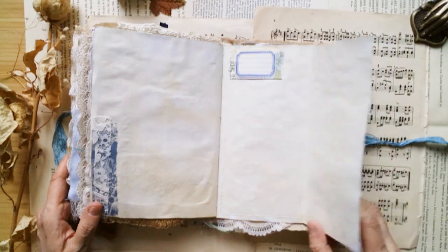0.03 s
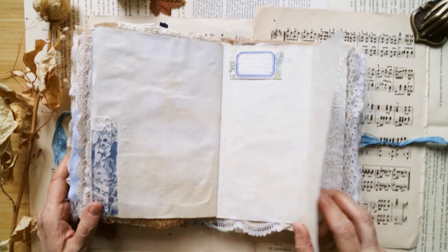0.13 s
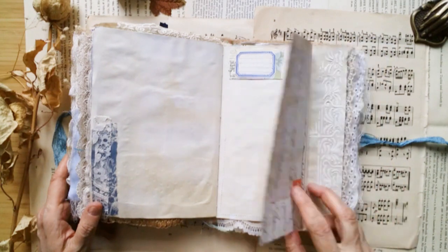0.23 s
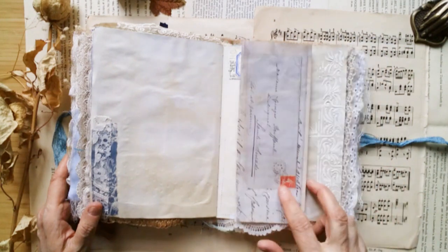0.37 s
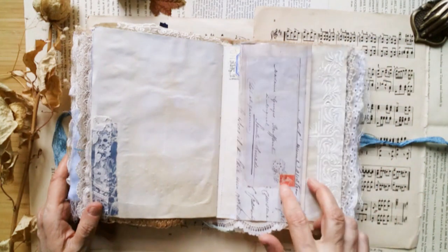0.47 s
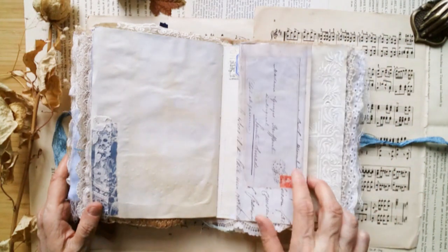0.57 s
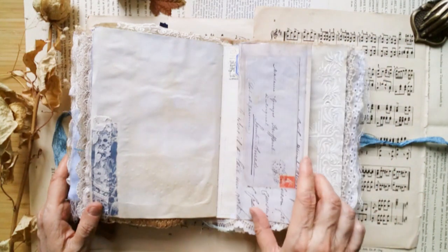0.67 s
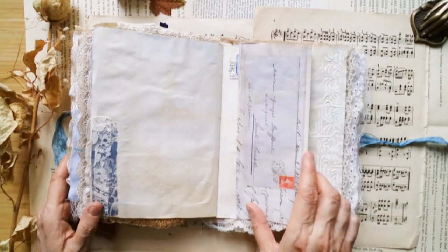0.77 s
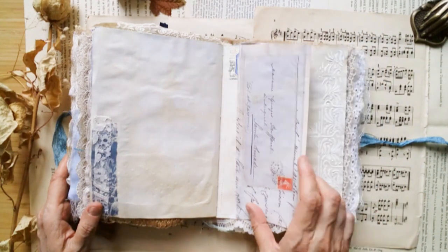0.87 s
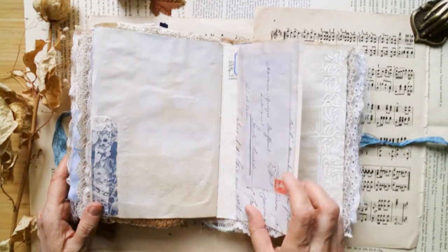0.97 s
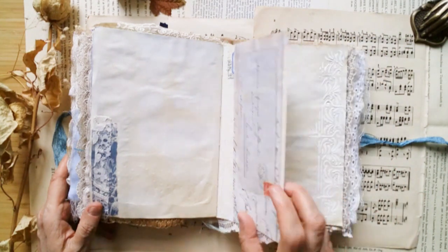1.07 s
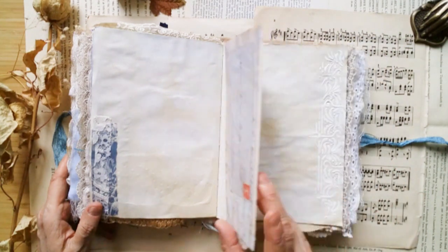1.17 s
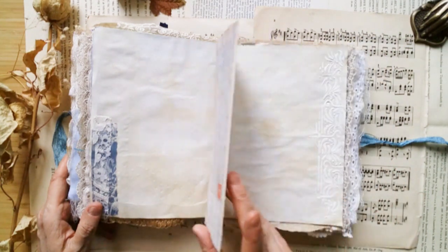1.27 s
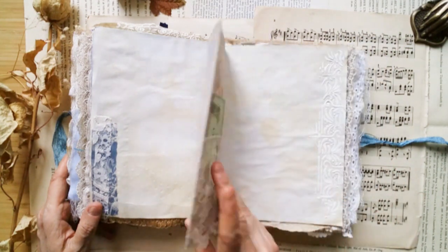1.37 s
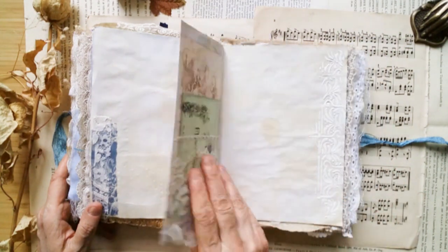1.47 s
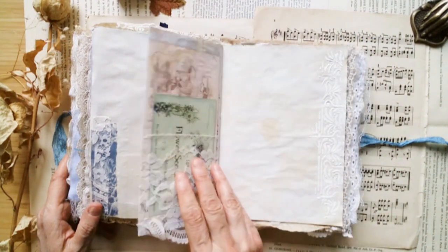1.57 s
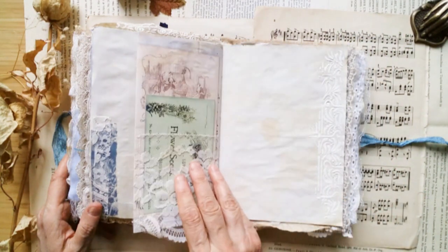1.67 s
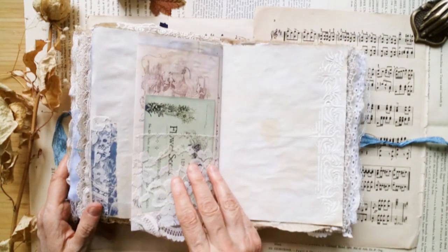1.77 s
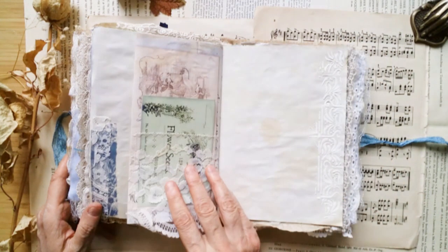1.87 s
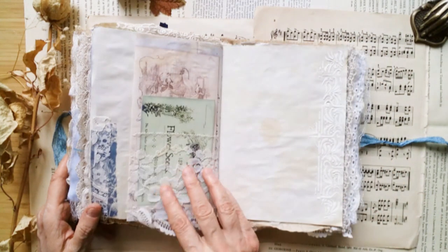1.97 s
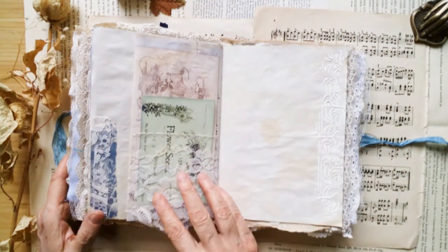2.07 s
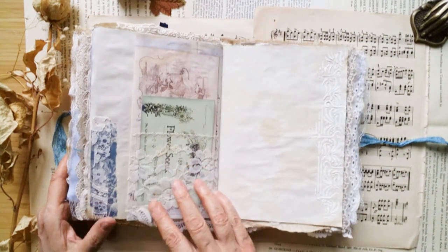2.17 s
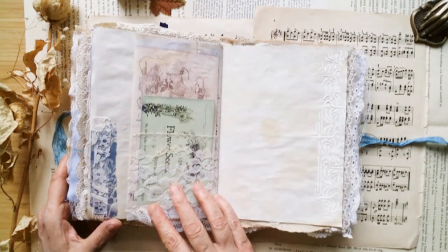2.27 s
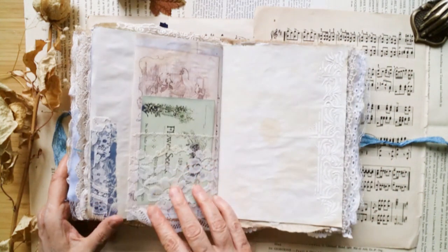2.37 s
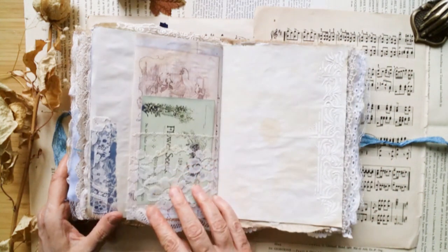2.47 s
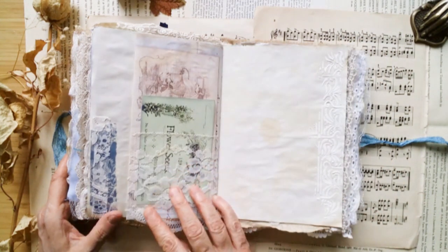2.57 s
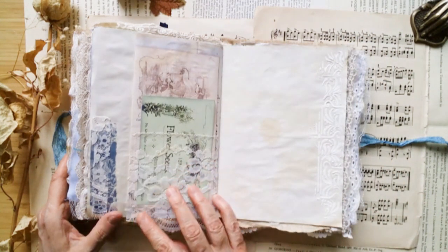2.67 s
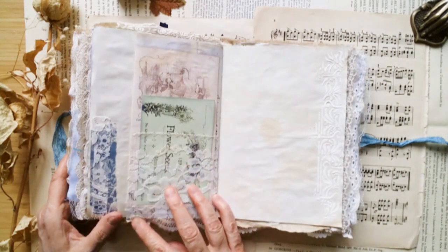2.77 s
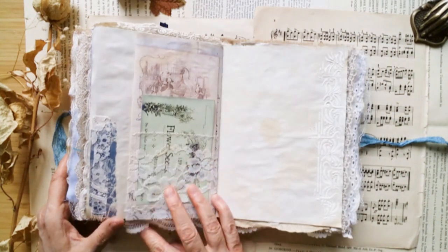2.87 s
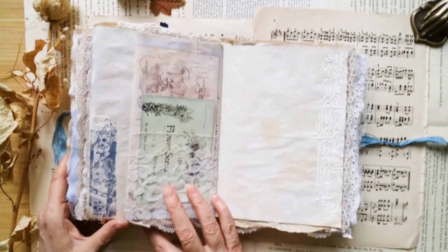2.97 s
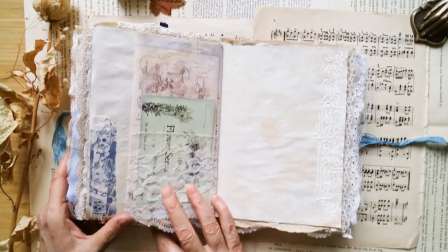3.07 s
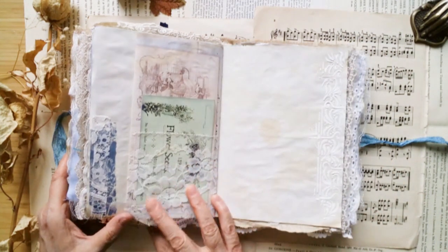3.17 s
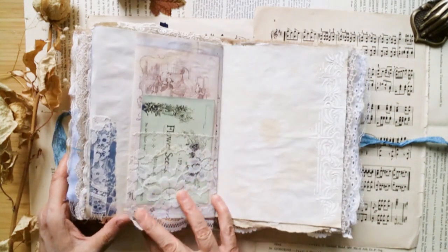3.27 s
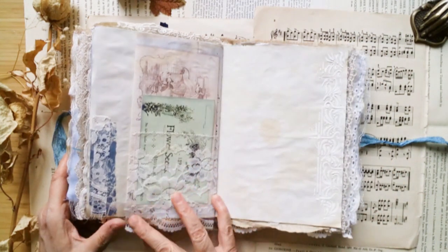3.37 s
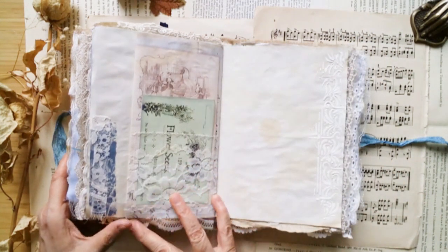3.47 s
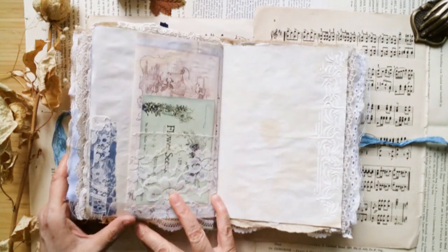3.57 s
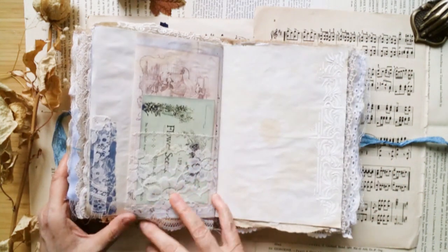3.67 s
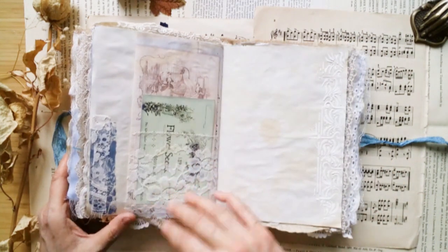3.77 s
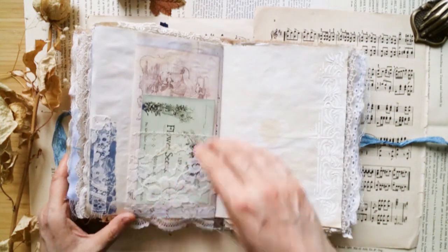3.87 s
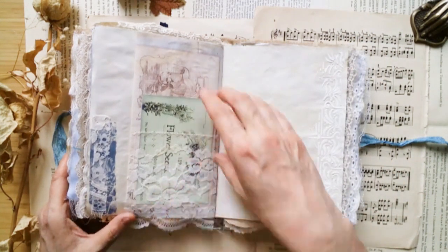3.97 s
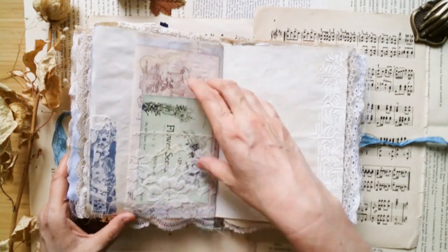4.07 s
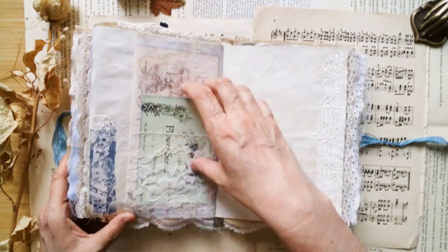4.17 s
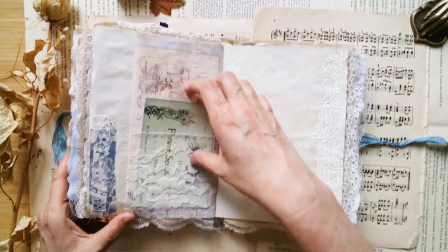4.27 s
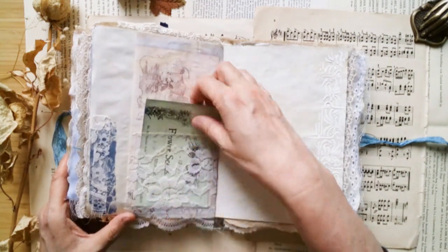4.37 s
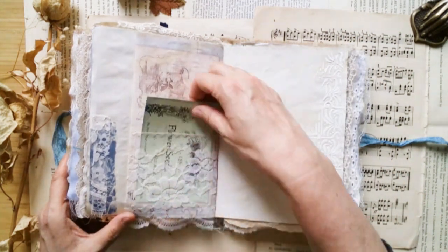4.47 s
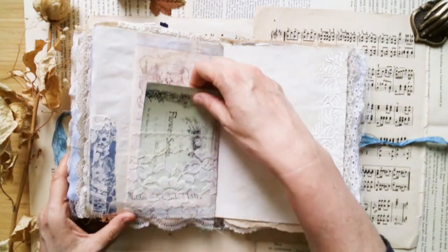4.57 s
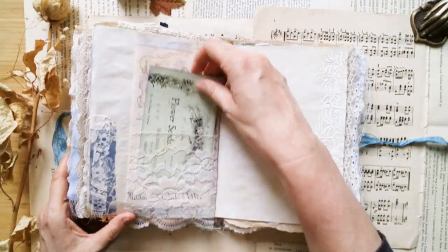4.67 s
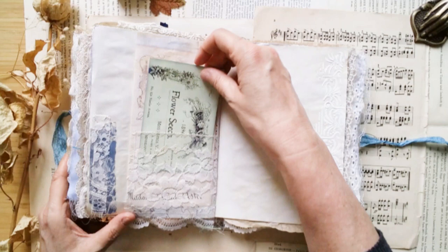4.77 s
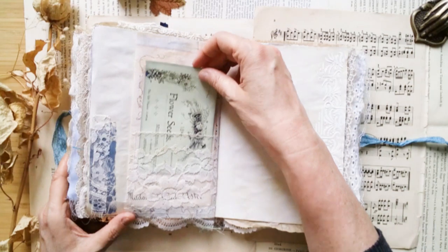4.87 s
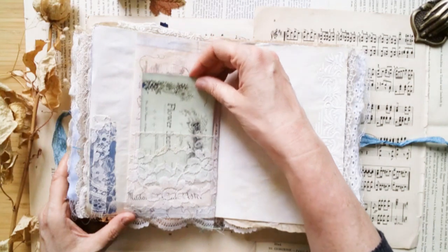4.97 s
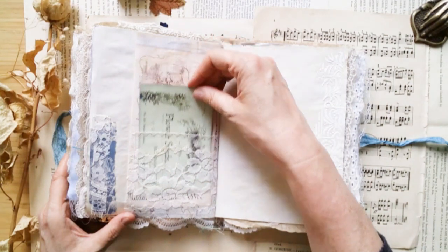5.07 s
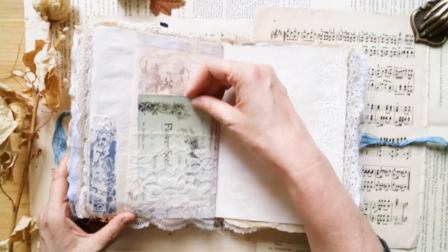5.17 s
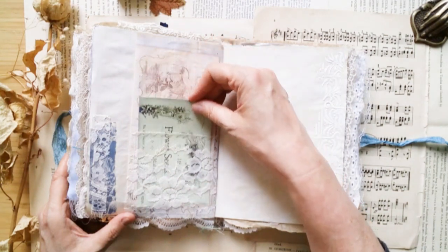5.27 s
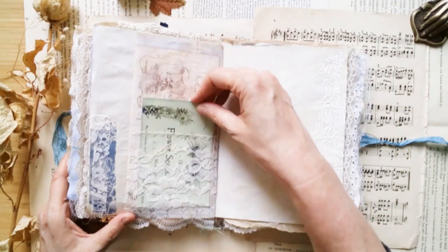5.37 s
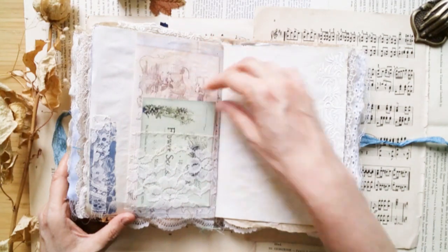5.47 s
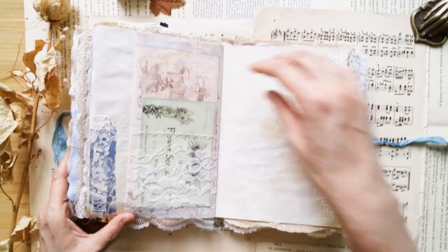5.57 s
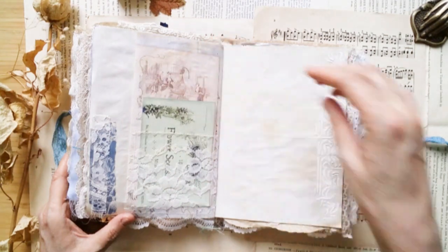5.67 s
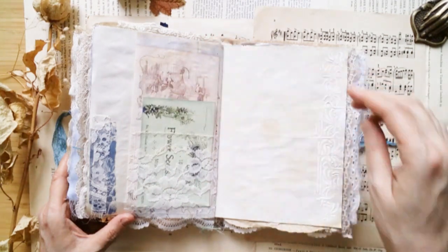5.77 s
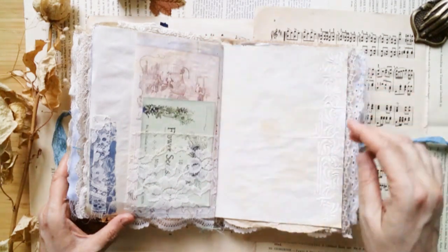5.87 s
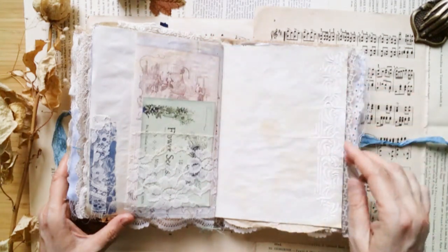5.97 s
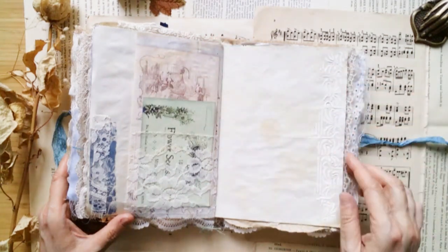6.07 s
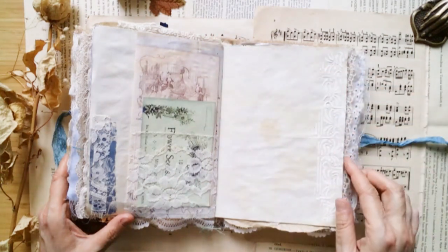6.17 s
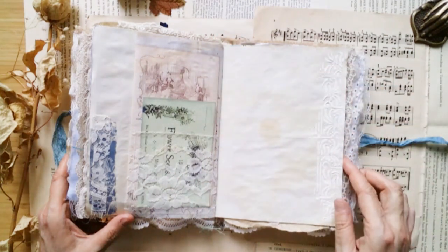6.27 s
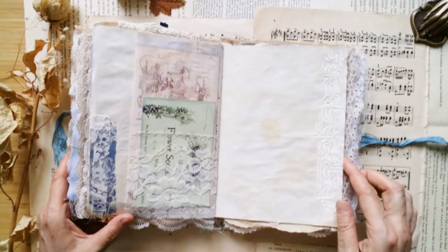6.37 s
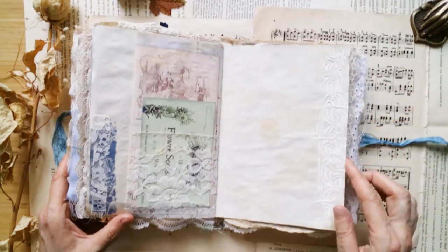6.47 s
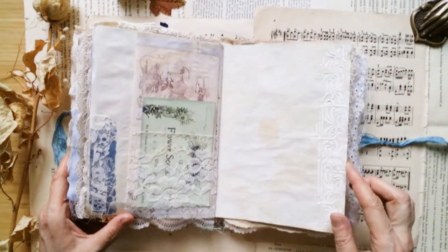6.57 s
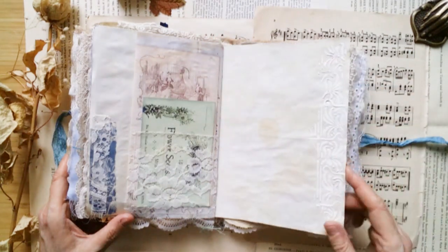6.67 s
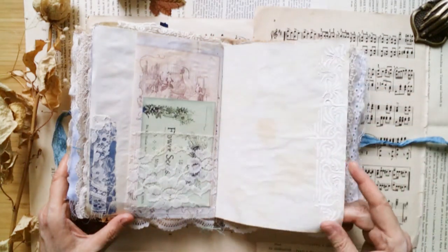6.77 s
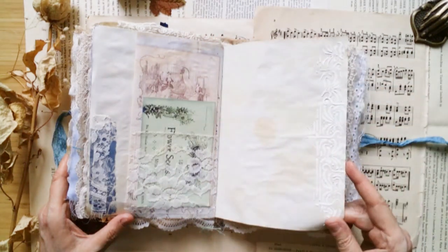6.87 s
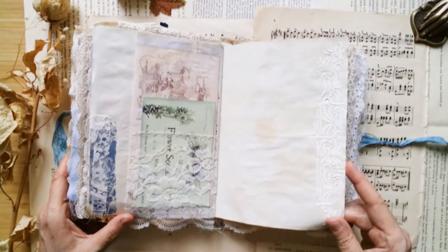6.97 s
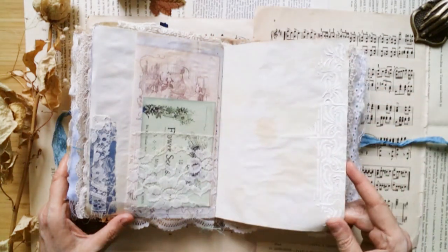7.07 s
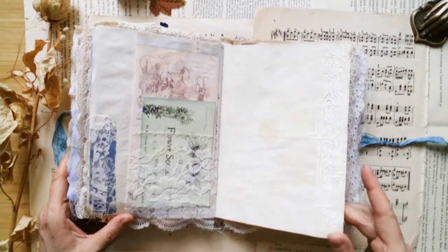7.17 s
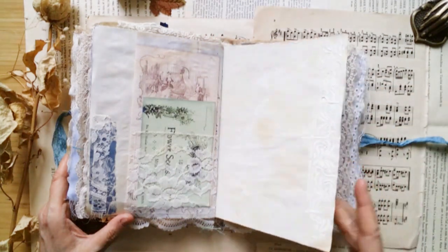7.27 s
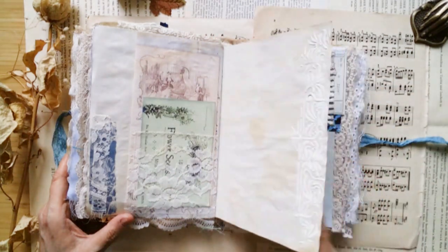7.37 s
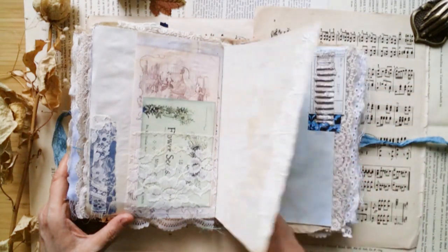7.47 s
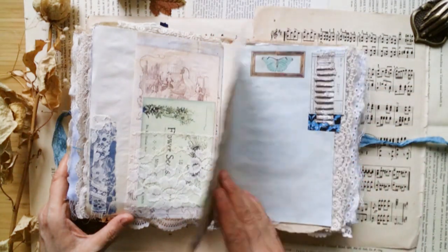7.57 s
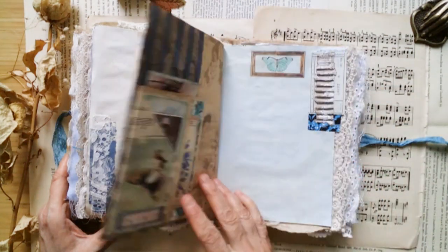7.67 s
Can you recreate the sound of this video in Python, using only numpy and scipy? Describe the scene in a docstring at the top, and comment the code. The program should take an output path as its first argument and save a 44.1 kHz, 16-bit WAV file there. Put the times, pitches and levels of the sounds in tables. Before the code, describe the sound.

Thick paper pages are turned and stroked by hand, with dry rustles, dull pops and crisp crackles, close up in a quiet room.

```python
"""Old album pages, close up

A quiet room, the microphone near an old album as hands turn and stroke its thick pages.
Fingers and sheets rub with a grainy hiss, creases snap, whole sheets buckle with a dull pop,
and the table booms softly as a page or a hand lands. A hard surface throws the paper sounds
back a moment later. Behind it all lie the faint hush of the room and a deep rumble."""
import sys
import numpy as np
from scipy import signal
from scipy.fft import rfft, irfft
from scipy.io import wavfile
from scipy.ndimage import uniform_filter1d

SR = 44100
rng = np.random.default_rng(int(sys.argv[2]) if len(sys.argv) > 2 else 0)


def output_pcm(signal):
    """Save a mono or channel-first signal as 16-bit PCM at the path in sys.argv[1].

    Samples are clipped to [-1, 1] before scaling.
    """
    pcm = np.clip(np.atleast_2d(signal).T, -1, 1) * 32767
    wavfile.write(sys.argv[1], SR, np.round(pcm).astype(np.int16))


N = 340011

# room air and microphone hiss: frequency_hz, relative_db
HUSH_SPECTRUM = [(25, -15), (45, -12.5), (108, -2.5), (150, -6), (225, -6), (345, -10), (660, -16.5),
                 (1900, -23), (4000, -33.5), (8000, -51), (12000, -42.5), (16000, -39)]
# swell of the rumble, ahead of the bass cut: time_s, level_db
RUMBLE_SWELL = [(0, -65.5), (1.4, -77), (1.7, -62), (2.1, -61), (2.6, -63.5), (3.3, -61.5), (4.5, -63),
                (5, -63), (5.6, -66.5), (6.1, -65.5), (7.71, -64)]
# decay of the room: frequency_hz, t60_s
ROOM_DECAY = [(200, 0.37), (1000, 0.47), (4000, 0.49), (12000, 0.42)]
# echoes off the table top, then a hard surface: delay_s, gain_db
ECHOES = [(.0017, -35), (0.0113, -14)]
# a page or a hand lands: start_s, peak_db
LANDINGS = [(0.161, -36), (0.996, -43), (1.125, -41), (1.514, -45), (1.6, -46), (3.163, -50.5),
            (5.045, -46), (5.172, -43), (5.22, -44), (6.722, -60), (6.853, -43), (7.261, -54), (7.309, -54),
            (7.542, -44), (7.573, -46)]
# modes of the table: pitch_hz, relative_db
TABLE_MODES = [(60, -0.5), (110, 11.5), (165, -7), (235, 7)]
# sheets buckle with a dull pop; some rows are a pop's quick echo: start_s, peak_db, pitch_hz, t60_s
POPS = [(0.0, -28, 1010, 0.033), (0.167, -22.5, 770, 0.034), (0.17, -22.5, 970, 0.037),
        (0.179, -26, 832, 0.042), (0.261, -40, 923, 0.032), (0.327, -37.5, 2230, 0.077),
        (0.852, -51, 568, 0.027), (0.918, -33.5, 650, 0.027), (0.973, -32.5, 1680, 0.05),
        (0.995, -27.5, 770, 0.073), (1.001, -26, 570, 0.02), (1.036, -31.5, 573, 0.032),
        (1.06, -32, 495, 0.063), (1.075, -28, 600, 0.018), (1.11, -43, 620, 0.015),
        (1.128, -17.5, 1440, 0.013), (1.134, -17.5, 1700, 0.02), (1.145, -29.5, 1700, 0.074),
        (1.239, -28, 790, 0.028), (1.371, -39, 564, 0.03), (3.87, -41, 2100, 0.046),
        (4.168, -43, 564, 0.08), (4.256, -39.5, 580, 0.032), (4.281, -31.5, 940, 0.018),
        (4.343, -35, 1710, 0.019), (4.524, -38.5, 577, 0.047), (5.108, -40, 603, 0.048),
        (5.148, -38, 1700, 0.035), (5.22, -24.5, 2100, 0.018), (5.368, -38, 1710, 0.024),
        (6.724, -21.5, 736, 0.032), (6.734, -28.5, 1350, 0.05), (6.845, -30.5, 420, 0.014),
        (6.855, -18.5, 1100, 0.05), (6.865, -28, 450, 0.027), (6.874, -23, 780, 0.028),
        (6.882, -27, 1110, 0.048), (6.892, -27.5, 730, 0.016), (6.9, -36, 686, 0.016),
        (7.174, -51, 1620, 0.062), (7.222, -40.5, 584, 0.026), (7.251, -29, 814, 0.04),
        (7.257, -32, 1320, 0.099), (7.271, -25, 800, 0.032), (7.31, -30, 900, 0.021),
        (7.324, -38, 800, 0.035), (7.397, -34, 430, 0.053), (7.527, -39, 900, 0.03),
        (7.542, -17.5, 825, 0.023), (7.552, -33, 1900, 0.048), (7.579, -22.5, 730, 0.035),
        (7.695, -34.5, 766, 0.021)]
# modes of a stiff sheet: pitch_hz, relative_db
SHEET_MODES = [(210, 1), (300, 3.5), (420, 2), (580, 4), (700, 0.5), (830, 5), (1040, 3.5), (1250, 3.5),
               (1390, 4), (1530, 5.5), (1750, 6), (2040, 5.5), (2420, -1), (2760, 2.5), (3150, -2),
               (3600, -33)]
# creases snap: start_s, middle_band_db, tilt_db_per_band
CREASES = [(0.0522, -45, 1), (0.1632, -27, 4), (0.3311, -44, -2), (0.7887, -51, 1), (0.8522, -50, 0),
           (0.883, -47, 1), (0.9743, -45, -14), (0.9957, -34, -10), (1.0674, -52, -15), (1.1286, -38, -12),
           (1.1355, -41, -27), (1.4381, -46, -2), (1.7546, -43, 0), (2.0124, -45, -3), (2.0211, -44, 0),
           (2.3254, -41, 6), (2.5767, -50, -3), (2.6451, -52, 0), (2.7252, -36, 5), (2.7642, -41, 10),
           (2.7752, -40, 4), (2.786, -40, 6), (2.8597, -37, 3), (2.9165, -35, 5), (2.92, -30, 8),
           (2.9303, -40, 10), (2.9464, -40, 3), (3.0827, -52, 0), (3.269, -46, 3), (3.4209, -45, 10),
           (3.4606, -39, 4), (3.5178, -36, 2), (3.5723, -44, 8), (3.8747, -36, -2), (4.1709, -43, -5),
           (4.1798, -47, -7), (4.3438, -28, 0), (4.3486, -34, 4), (4.3644, -24, 6), (4.5036, -29, 0),
           (4.6924, -35, -4), (5.05, -39, 1), (5.0755, -41, 0), (5.1108, -29, 2), (5.1499, -37, -4),
           (5.1654, -34, -2), (5.1926, -31, 2), (5.2015, -29, 3), (5.2204, -16.5, 2), (5.2325, -22, 4),
           (5.3691, -24, -1), (5.7507, -45, 6), (6.7254, -49, -21), (6.8562, -42, -19), (7.1753, -56, -7),
           (7.5421, -46, -21)]
# dull, middle and bright bands of a snap: centre_hz, width_hz
SNAP_BANDS = [(2200, 2300), (5400, 4500), (10500, 7500)]
# a finger or sheet slides over paper:
# full_pressure_s, rise_s, hold_s, fall_s, level_db, tilt_db_per_octave, body_lift_db
STROKES = [(0.0, 0.12, 0.0018, 0.11, -36, -8, 8.5), (0.11, 0.13, 0.0077, 0.095, -33, -6.5, -2.5),
           (0.15, 0.06, .012, 0.027, -24, -1.5, -8), (0.196, 0.12, 0, 0.079, -44, -5.5, 18.5),
           (0.264, .1, 0.015, .1, -54.5, -5, 11), (0.337, 0.072, 0, 0.039, -47, -3.5, 6),
           (0.419, 0.094, 0, .12, -54, -8.5, 7.5), (0.538, 0.084, 0.093, .04, -49.5, -5, 1.2),
           (0.836, 0.34, 0.02, 0.44, -56.5, -6.5, 15), (0.886, 0.049, 0.011, 0.089, -46, -5.5, -5),
           (1.002, 0.02, 0, 0.14, -43, -9.5, 15), (1.147, .1, 0.12, 0.21, -51, -3.5, 7.5),
           (1.408, 0.065, 0.017, .1, -52.5, -6.5, 5), (1.495, 0.071, 0.024, 0.28, -45.5, -5, 3),
           (1.619, 0.043, 0.027, 0.081, -30, -7, 1), (1.852, 0.032, 0, 0.14, -55.5, -11.5, 4),
           (1.953, 0.08, 0.076, 0.037, -48, -7, 1.2), (2.167, 0.41, 0.083, 0.33, -46.5, -1.5, 4),
           (2.5, .3, .1, 0.33, -68, -3.5, 7), (2.745, 0.079, .095, 0.25, -48.5, -2, 5.5),
           (2.927, 0.091, 0, .12, -46.5, -4.5, 10.5), (3.135, .15, 0, .15, -58.5, -1.5, 0),
           (3.219, 0.021, 0.092, 0.41, -46.5, -0.5, 3), (3.47, 0.1, 0.033, .04, -47.5, -5, 8),
           (3.575, 0.051, 0.00068, 0.031, -48.5, -9, 15), (3.634, 0.086, 0, 0.096, -55, -4.5, 16.5),
           (3.837, 0.17, .01, .5, -58, -2.2, 5), (3.879, .025, 0.00042, 0.033, -40.5, -2.2, 3.5),
           (4.18, 0.011, 0, 0.053, -52, -8.5, 16.5), (4.252, 0.063, 0.0098, 0.075, -46, -3.5, 9),
           (4.344, 0.03, 0.0038, 0.11, -39, 0, 3), (4.431, 0.017, .1, .03, -43.5, -4.5, 1.7),
           (4.581, 0.026, 0.051, 0.19, -38.5, -4, -1.3), (4.711, 0.12, 0.038, 0.29, -36.5, -1.5, -2.5),
           (4.832, 0.23, 0.0029, 0.091, -47, -9.5, 5), (5.02, .08, 0.062, 0.14, -46, -5, 4),
           (5.12, 0.13, 0, 0.039, -42, -0.5, 3.5), (5.232, 0.22, 0.0039, 0.061, -37, -3, 7.5),
           (5.378, .11, 0, 0.17, -42, -4, 0.5), (5.521, 0.26, 0.0053, 0.038, -42, -2, 7),
           (6.647, .3, 0.025, 0.36, -62.5, -1, 13), (6.8, 0.079, 0.031, .1, -54.5, -1, 1.2),
           (6.864, 0.091, 0.016, 0.1, -47.5, -3.5, 5), (6.99, 0.25, 0.0053, .08, -54.5, -4.5, 7),
           (7.18, 0.031, 0.0082, 0.13, -70, -13, 3), (7.238, 0.029, 0.085, 0.11, -50, -4.5, 5),
           (7.336, 0.11, 0.0012, 0.028, -43.5, 1.7, 11), (7.469, 0.13, 0.08, .2, -58, -3, -9),
           (7.575, 0.17, 0.086, .3, -43.5, -1, 4)]
# the four voices of rubbing (body, scrape, hiss, fizz): centre_hz
VOICE_HZ = [680, 2200, 5400, 11000]
# the same voices while the hands rest on the pages: level_db
RESTING_DB = [-55, -61, -70, -74]
# colour of the rubbing, including the microphone's resonance near 8 kHz: frequency_hz, gain_db
RUB_COLOUR = [(60, 0.5), (250, -7.5), (420, -6), (600, 2), (800, -4), (1200, -5), (2100, -3.5),
              (3100, -4.5), (6500, -3), (8000, -1), (10000, -2), (13000, -7.5), (15000, -14), (16000, -26)]
# added colour of card, thinner than paper: frequency_hz, gain_db
CARD_COLOUR = [(700, 0.5), (1400, -1), (2000, -1), (3000, 1.5), (5000, -0.9)]
# strokes run on smooth card: start_s, end_s
ON_CARD = [(1.83, 2.05), (4.4, 5.55)]
# a whole page sweeps down, with less hiss: start_s, end_s
PAGE_SWEEPS = [(0.05, 0.18), (1.58, 1.7)]
# the finger sticks and slips: start_s, end_s
STICKING = [(2.73, 2.95), (3.42, 3.58), (4.31, 4.53), (5.1, 5.24)]


def gain_of(db):
    """Decibels to gain."""
    return 10 ** (np.asarray(db) / 20)


def unit_rms(x):
    """Scales to an rms of 1."""
    return x / np.sqrt(np.mean(x ** 2) + 1e-20)


def curve_at(points, hz):
    """Reads a table of frequency_hz, value along a log-frequency axis."""
    frequency_hz, value = np.transpose(points)
    return np.interp(np.log(hz + 1), np.log(frequency_hz + 1), value)


def during(spans, t):
    """1 where t lies inside a span, 0 outside."""
    return sum((t > start_s) & (t < end_s) for start_s, end_s in spans)


def add(mix, start_s, sound):
    """Adds a sound to the mix at its start time."""
    part = mix[round(start_s * SR):][:len(sound)]
    part += sound[:len(part)]


def band(x, low_hz, high_hz):
    """Gentle band-pass."""
    return signal.sosfilt(signal.butter(2, [low_hz, high_hz], "band", fs=SR, output="sos"), x)


def minimum_phase(gain):
    """Impulse response that starts at once and has the given magnitude spectrum."""
    cepstrum = irfft(np.log(gain + 1e-7))
    cepstrum[1:len(gain) - 1] *= 2
    cepstrum[len(gain):] = 0
    return irfft(np.exp(rfft(cepstrum)))


def room_hush(level_db=-61.5):
    """Steady room air and microphone hiss."""
    colour = gain_of(curve_at(HUSH_SPECTRUM, np.fft.rfftfreq(N, 1 / SR)))
    return gain_of(level_db) * unit_rms(irfft(rfft(rng.standard_normal(N)) * colour, N))


def rumble():
    """Narrow noise at the bottom of hearing swells and fades."""
    level_db = np.interp(np.arange(N) / SR, *np.transpose(RUMBLE_SWELL))
    return gain_of(level_db) * unit_rms(band(rng.standard_normal(N), 36.6, 60.0))


def room_reflections(x, tail_db=-15.5):
    """Two echoes reach the microphone, then a diffuse tail whose bands die at their own speed."""
    taps = np.zeros(SR // 2)
    slots = np.arange(500, SR // 2 - 20, 20)
    taps[slots + rng.integers(0, 20, len(slots))] = rng.choice([-1., 1.], len(slots))
    hz, t, spectra = signal.stft(taps, SR, nperseg=256)
    decay = gain_of(-60 * t / curve_at(ROOM_DECAY, hz)[:, None])
    tail = signal.istft(spectra * decay, SR, nperseg=256)[1]
    tail *= gain_of(tail_db) / np.linalg.norm(tail)
    echoes = np.zeros(len(tail))
    for delay_s, gain_db in ECHOES:
        echoes[round(delay_s * SR)] += gain_of(gain_db)
    tail += band(echoes, 166, 2800)  # they come back duller
    return signal.fftconvolve(x, tail)[:N]


def table_thud(peak_db, scatter, t60_s=0.14):
    """A soft push sets the low modes of the table going."""
    mode_hz, mode_db = np.transpose(TABLE_MODES)[:, :, None]
    t = np.arange(SR // 2) / SR
    envelopes = gain_of(mode_db + 2.5 * scatter - 60 * t / t60_s)
    modes = envelopes * np.sin(2 * np.pi * mode_hz * t + 3 * scatter)
    sound = modes.sum(0) * (1 - np.exp(-t / .006))
    return gain_of(peak_db) * sound / abs(sound).max()


def sheet_pop(peak_db, pitch_hz, t60_s, scatter, octaves_below=1, octaves_above=0.84):
    """A buckle's pop or its quick echo: sheet modes near its pitch ring, detuned by the bent shape."""
    mode_hz, mode_db = np.transpose(SHEET_MODES)[:, :, None]
    uneven_db, detune, damping = scatter
    t = np.arange(8000) / SR
    reach_octaves = np.where(mode_hz > pitch_hz, octaves_above, octaves_below)
    strike_db = -6 * (np.log2(mode_hz / pitch_hz) / reach_octaves) ** 2 + uneven_db
    decay_db = -60 * t / t60_s * (mode_hz / 1000) ** 0.054 * (1 + 0.2 * damping)
    phase = 2 * np.pi * mode_hz * (1 + 0.06 * detune) * t + 1.11 * damping
    modes = gain_of(mode_db + strike_db + decay_db) * np.sin(phase)
    sound = modes.sum(0) * (1 - np.exp(-t / 0.00029))
    return gain_of(peak_db) * sound / abs(sound).max()


def crease_snap(middle_band_db, tilt_db, grit, sag_db=2.5):
    """A crease gives way in one spike; splinters follow, then a short breath of settling fibres."""
    t = np.arange(len(grit)) / SR
    splinters = .15 * grit * np.exp(-t / .0009)
    fibres = gain_of(-22.5) * grit * np.exp(-t / 0.0036)
    crack = splinters + fibres
    crack[0] += .75 * np.sign(grit[0])  # the spike
    centre_hz, width_hz = np.transpose(SNAP_BANDS)
    bands_db = middle_band_db + np.array([-tilt_db - sag_db, 0, tilt_db - sag_db])
    bands_db += 20 * np.log10(SR / 2 / width_hz)  # a narrow band needs more gain for its peak
    dull_db, _, bright_db = bands_db
    colour = [(500, dull_db - 16), *zip(centre_hz, bands_db),
              (13000, bright_db - 1.5), (16000, bright_db - 7)]
    spectrum = gain_of(curve_at(colour, np.fft.rfftfreq(512, 1 / SR)))
    return np.convolve(crack, minimum_phase(spectrum))


def finger_ticks(per_s=35, level_db=-44, spread_db=3, tilt_db=4):
    """Small bright snaps at random moments while the finger sticks, as rows like CREASES."""
    return [(rng.uniform(start_s, end_s), level_db + spread_db * rng.standard_normal(), tilt_db)
            for start_s, end_s in STICKING for _ in range(round((end_s - start_s) * per_s))]


def stroke_levels(t, ramp_db=20, paper_lift_db=-0.6, card_lift_db=4.5, sweep_lift_db=-4):
    """Level in dB of the four rubbing voices: each stroke rises, holds and falls, over resting hands."""
    full_s, rise_s, hold_s, fall_s, level_db, tilt_db, body_db = np.transpose(STROKES)[:, :, None]
    rising = np.maximum((full_s - t) / rise_s, 0)
    falling = np.maximum((t - full_s - hold_s) / fall_s, 0)
    envelope_db = level_db - ramp_db * (rising + falling)
    scrape_octaves, fizz_octaves = np.log2(np.array(VOICE_HZ)[[1, 3]] / VOICE_HZ[2])
    hiss_db = np.where(during(ON_CARD, full_s), card_lift_db, paper_lift_db)
    hiss_db = np.where(during(PAGE_SWEEPS, full_s), sweep_lift_db, hiss_db)
    lifts_db = np.array([body_db, scrape_octaves * tilt_db, hiss_db, fizz_octaves * tilt_db])
    stroke_power = (gain_of(envelope_db + lifts_db) ** 2).sum(1)
    return 10 * np.log10(stroke_power + gain_of(RESTING_DB)[:, None] ** 2)


def colour_drift(shape, depth_db=1.8):
    """Patches of the rubbing spectrum drift louder and softer."""
    across_bands = uniform_filter1d(rng.standard_normal(shape), size=5, axis=0)
    patches = uniform_filter1d(across_bands, size=10, axis=1)
    return gain_of(depth_db * unit_rms(patches))


def fibre_friction(slips_per_s=350, sliding_share=.04, sticking_share=.12):
    """Countless fibre slips make hiss; where the finger sticks, sparse, larger slips stand out."""
    slip_share = np.where(during(STICKING, np.arange(N) / SR), sticking_share, sliding_share)
    hiss, wobble = rng.standard_normal((2, N))
    size, chance = rng.random((2, N))
    slips = gain_of(-3.5 * np.log(size + .03)) * (chance < slips_per_s / SR) * np.sign(hiss)
    uneven_drag = gain_of(1.2 * unit_rms(uniform_filter1d(wobble, size=300)))
    return np.sqrt(1 - slip_share) * hiss * uneven_drag + np.sqrt(slip_share) * unit_rms(slips)


def page_rub():
    """Close friction swells with each stroke, coloured by paper or card and by the microphone."""
    hz, t, spectra = signal.stft(fibre_friction(), SR, nperseg=256)
    voice_blend = np.array([curve_at(list(zip(VOICE_HZ, solo)), hz) for solo in np.eye(len(VOICE_HZ))])
    shape_db = voice_blend.T @ stroke_levels(t) + curve_at(RUB_COLOUR, hz)[:, None]
    shape_db += curve_at(CARD_COLOUR, hz)[:, None] * during(ON_CARD, t)
    rubbed = spectra * gain_of(shape_db) * colour_drift(spectra.shape)
    return signal.istft(rubbed, SR, nperseg=256)[1][:N]


def scene():
    """Close paper sounds and their reflections, with table, hush and rumble, in mono."""
    paper, table = page_rub(), np.zeros(N)
    snaps = CREASES + finger_ticks()
    for (start_s, *snap), grit in zip(snaps, rng.standard_normal((len(snaps), 1500))):
        add(paper, start_s, crease_snap(*snap, grit))
    for start_s, *pop in POPS:
        scatter = np.clip(rng.standard_normal((3, len(SHEET_MODES), 1)), -2, 2)
        add(paper, start_s, sheet_pop(*pop, scatter))
    for start_s, peak_db in LANDINGS:
        scatter = np.clip(rng.standard_normal((len(TABLE_MODES), 1)), -2, 2)
        add(table, start_s, table_thud(peak_db, scatter))
    return (paper + room_reflections(paper) + table + room_hush() + rumble())[None]


def record(dry, bass_cut_hz=44, top_hz=16100):
    """The microphone cuts the deepest bass; a steep low-pass takes off the highest treble."""
    thinned = signal.sosfilt(signal.butter(6, bass_cut_hz, "high", fs=SR, output="sos"), dry)
    low_pass = signal.firwin(511, top_hz, window=("kaiser", 9), fs=SR)
    return signal.oaconvolve(thinned, low_pass[None], "same")


dry = scene()
out = record(dry)
output_pcm(out)
```